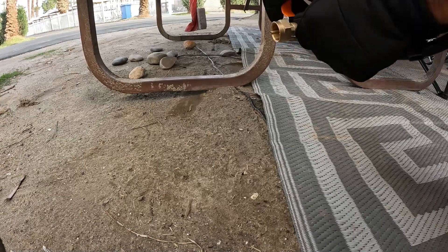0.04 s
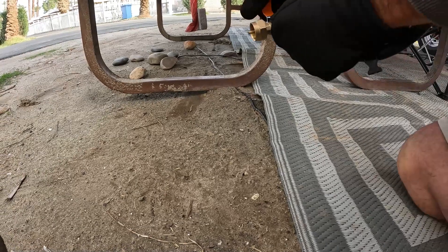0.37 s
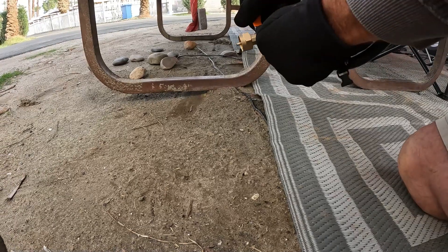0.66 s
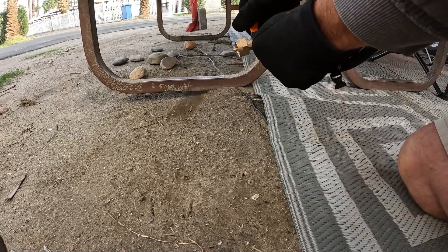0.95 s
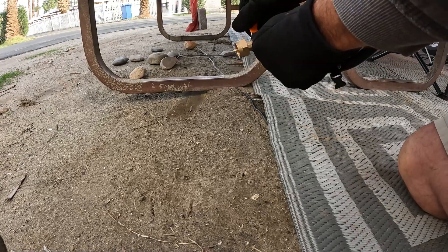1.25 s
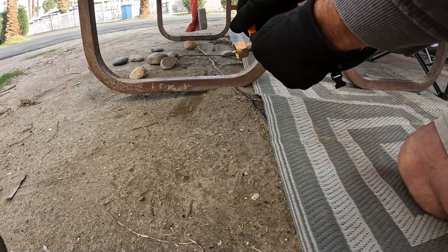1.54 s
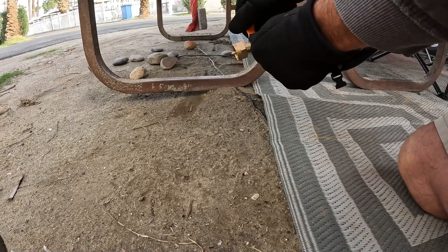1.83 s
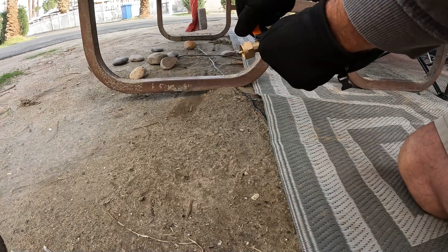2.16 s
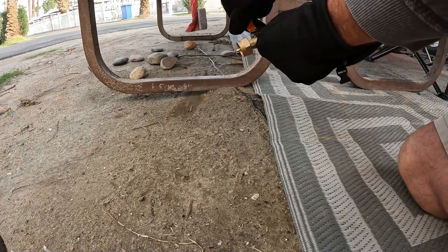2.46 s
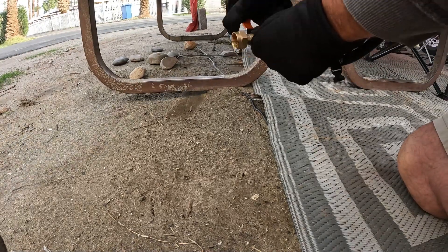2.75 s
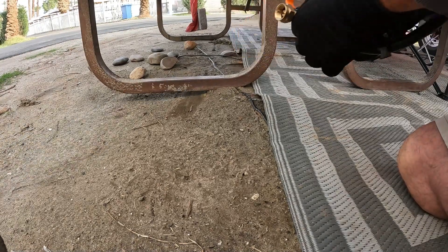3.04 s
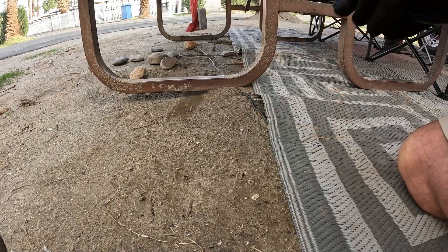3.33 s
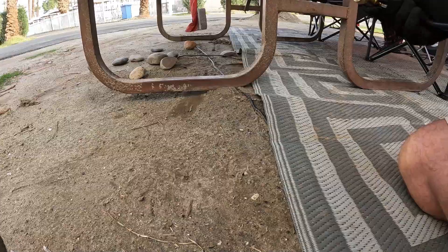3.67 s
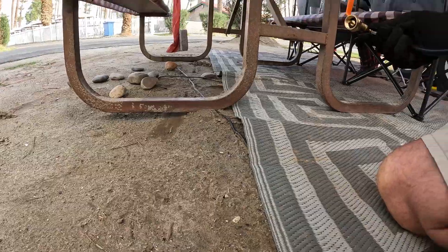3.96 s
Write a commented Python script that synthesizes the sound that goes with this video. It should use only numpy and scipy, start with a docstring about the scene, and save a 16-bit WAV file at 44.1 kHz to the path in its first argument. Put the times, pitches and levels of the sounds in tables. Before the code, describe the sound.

A close jet of gas starts thin, widens to a roaring spray and is suddenly shut off. Small valve ticks and soft glove rustling come before and after, while distant engines rumble in the open air.

```python
"""Outdoors, distant engines and traffic rumble and hum. A glove and sleeve rustle, and a brass valve
ticks as the hand eases it open. Escaping gas starts as a thin hiss, widens to a spray, roars for a
moment as a plume of mist shoots out, and is shut off. A close echo from the ground colours the jet.
A faint fizz lingers, followed by a few small squeaks, rustles and ticks."""
import sys
import numpy as np
from scipy import signal
from scipy.fft import rfft, irfft
from scipy.io import wavfile
from scipy.ndimage import uniform_filter1d, map_coordinates

SR = 44100
rng = np.random.default_rng(int(sys.argv[2]) if len(sys.argv) > 2 else 0)


def unload_wav(signal):
    """Save mono or channel-first audio to the path in sys.argv[1] as 16-bit WAV at rate SR, clipped to [-1, 1]."""
    wavfile.write(
        sys.argv[1],
        SR,
        np.round(np.clip(np.atleast_2d(signal).T, -1, 1) * 32767).astype(np.int16),
    )


N = 176400
T = np.arange(N) / SR  # time of each sample [s]
FREQS = np.fft.rfftfreq(N, 1 / SR)  # frequency of each slot in a spectrum [Hz]


def amp(db):
    """Turns decibels into a number to multiply by."""
    return 10 ** (np.asarray(db) / 20)


def unit(x):
    """Scales a signal to an average power of 1."""
    return x / np.sqrt(np.mean(x ** 2) + 1e-20)


def read(points):
    """Joins a table's points to give a value at every frequency, on a log scale."""
    hz, value = np.transpose(points)
    return np.interp(np.log(FREQS + 1), np.log(np.abs(hz) + 1), value)


def level(points):
    """Joins (time [s], level [dB]) points to give a gain at every sample."""
    return amp(np.interp(T, *np.transpose(points)))


def shape(colour, low_hz):
    """Gain at every frequency for a tone colour, turned down below low_hz."""
    low_cut = .001 + 1 / np.sqrt(1 + (low_hz / (FREQS + 1)) ** 8)
    return amp(read(colour)) * low_cut


def wander(rate_hz):
    """A smooth random wobble, mostly slower than rate_hz."""
    spectrum = rfft(rng.standard_normal(N))
    return unit(irfft(spectrum / np.sqrt(1 + (FREQS / rate_hz) ** 4), N))


def noise(colour, width, low_hz=0):
    """Stereo noise: both ears share a middle part, and an opposite side part adds width."""
    mid, side = rfft(rng.standard_normal((2, N)))
    share = amp(read(width))
    pair = np.array([mid + share * side, mid - share * side]) / np.hypot(1, share)
    return unit(irfft(pair * shape(colour, low_hz), N))


def eddies(x, depth_db, size=512):
    """Makes a sound swirl: random patches of time and frequency swell and sink."""
    slices = signal.stft(x, nperseg=size)[2]
    patches = rng.standard_normal(slices.shape[1:])
    patches = uniform_filter1d(patches, size=9, axis=0)  # smooth over frequency
    patches = uniform_filter1d(patches, size=6, axis=1)  # smooth over time
    return signal.istft(slices * amp(depth_db * unit(patches)), nperseg=size)[1][:, :N]


def arch(start, length):
    """One soft swell, shaped like half a sine wave."""
    return np.sin(np.pi * np.clip((T - start) / length, 0, 1))


def echoes(x, fade_s, channels):
    """A crowd of random reflections that fades by 60 dB in fade_s seconds."""
    t = T[:SR // 2]
    tail = rng.standard_normal((channels, len(t))) * amp(-60 * t / fade_s) * (t > .001)
    return signal.fftconvolve(x, tail / np.linalg.norm(tail[0]), axes=1)[:, :N]


# Tone colours of the engines and far traffic: (frequency [Hz], relative level [dB])
RUMBLE_COLOUR = [(10, -17.5), (25, -6), (38, -6), (48, 1), (62, -0.5), (76, -8), (135, -10.5), (165, -14.5),
                 (235, -20), (300, -32), (500, -47.5), (15000, -140)]
TRAFFIC_COLOUR = [(150, 0), (400, -0.5), (600, -1.5), (930, 0.5), (1350, -7), (1900, -15.5), (3000, -25),
                  (6000, -40.5), (9000, -55.5), (15000, -75.5)]
# How loud each one is: (time [s], level [dB])
RUMBLE_LEVEL = [(0, -24.5), (1.2, -24.5), (2.6, -26), (3.8, -23.5)]
TRAFFIC_LEVEL = [(0, -39.5), (.5, -39), (1.5, -38.5), (2.4, -42), (2.8, -40.5), (3.2, -38), (3.75, -37),
                 (4, -37)]
# Notes in the engine hum: (pitch [Hz], typical level [dB])
HUM_NOTES = [(248, -52), (334, -53.5), (468, -56)]
# How wide the street and the cloth sound: (frequency [Hz], side compared with middle [dB])
AIR_WIDTH = [(25, -37), (60, -41), (120, -49), (240, -26.5), (480, -17.5), (950, -14), (1890, -8.5),
             (7500, -6.5), (15000, -2.5)]


def street(hum_swing_db=2.5):
    """Distant engines rumble and hum unsteadily while far tyres slowly swell and fade."""
    hum = 0
    for hz, db in HUM_NOTES:
        loudness = amp(db + hum_swing_db * wander(2.9))
        pitch = hz * (1 + .008 * wander(6))
        hum += loudness * unit(np.sin(2 * np.pi * np.cumsum(pitch) / SR))
    tyres = level(TRAFFIC_LEVEL) * eddies(noise(TRAFFIC_COLOUR, AIR_WIDTH), depth_db=1.56, size=2048)
    rumble = level(RUMBLE_LEVEL) * noise(RUMBLE_COLOUR, AIR_WIDTH)
    return rumble + tyres + hum


# Tone colours of rubbing cloth and of quick strokes: (frequency [Hz], relative level [dB])
CLOTH_COLOUR = [(800, -1), (2200, 4.5), (3500, -1.5), (5500, -5.5), (7600, -9), (8400, -15.5),
                (12500, -17.5), (15000, -33)]
STROKE_COLOUR = [(1200, -6), (2400, 2), (3300, 4.5), (5200, -4.5), (7500, -10.5), (8500, -16), (13000, -21),
                 (15000, -26)]
# How loudly the glove and sleeve rub: (time [s], level [dB])
RUBBING_LEVEL = [(0, -75), (.2, -55.5), (.36, -59), (.48, -66), (.6, -60), (.75, -70), (2.3, -79.5),
                 (2.79, -90), (2.89, -61), (3.03, -65.5), (3.2, -60.5), (3.5, -59.5), (3.75, -59), (4, -58)]
# Quick strokes of the glove: (start [s], length [s], level [dB])
STROKES = [(.385, 0.033, -48.5), (.408, .045, -53.5), (2.825, 0.057, -53), (3.143, .035, -54)]


def glove():
    """Cloth rubs with a grainy rustle, and the glove brushes the valve a few times."""
    rubbing = level(RUBBING_LEVEL) * noise(CLOTH_COLOUR, AIR_WIDTH)
    swells = sum(amp(db) * arch(start, length) for start, length, db in STROKES)
    strokes = swells * noise(STROKE_COLOUR, AIR_WIDTH)
    grain = amp(1.8 * wander(200))
    return grain * eddies(rubbing + strokes, depth_db=1.0)


def snap(start, colour, low_hz):
    """One sharp click with the given tone colour and a total energy of 1."""
    gain = shape(colour, low_hz)
    log_gain = np.log(np.concatenate([gain, gain[-2:0:-1]]))
    phase = -signal.hilbert(log_gain).imag[:len(FREQS)]  # packs the energy at the click's front
    delay = 2 * np.pi * FREQS * start
    click = irfft(gain * np.exp(1j * (phase - delay)), N)
    return click / np.linalg.norm(click)


# Ticks of the brass valve: (time [s], rattle level [dB], time to fade 60 dB [s], low cut [Hz])
TICKS = [(0.2302, -27, 0.0096, 500), (0.4976, -49, 0.014, 3100), (0.5454, -50.5, 0.013, 3600),
         (2.8815, -47, 0.015, 3200), (3.738, -52, 0.013, 2500)]
# Tone colour of a tick: (frequency [Hz], relative level [dB])
TICK_COLOUR = [(400, -6), (1150, 7), (1900, 1), (2700, 2), (4000, -2), (5600, -1), (7500, -13), (9300, -7),
               (11500, -18), (15000, -24)]
# How wide the ticks and the gas sound: (frequency [Hz], side compared with middle [dB])
VALVE_WIDTH = [(120, -41), (400, -17.5), (2000, -21), (6000, -12), (10000, -15.5), (11500, -13),
               (12300, -6.5), (13500, -2.5)]


def valve_ticks(snap_db=13, rise_s=.0006, tail_db=-34, tail_fade_s=.086):
    """The hand stops the brass ringing, so each tick is a snap, a short rattle and a faint tail."""
    ticks = np.zeros((2, N))
    for start, db, fade_s, low_hz in TICKS:
        age = np.maximum(T - start, 0)
        rise = np.minimum(age / rise_s, 1)
        fade = amp(-60 * age / fade_s) + amp(tail_db - 60 * age / tail_fade_s)
        rattle = rise * fade * noise(TICK_COLOUR, VALVE_WIDTH, low_hz)
        ticks += amp(db) * (amp(snap_db) * snap(start, TICK_COLOUR, low_hz) + rattle)
    return ticks


# Tone colours of the thin leak, broad spray and roaring plume: (frequency [Hz], relative level [dB])
LEAK_COLOUR = [(500, -23), (1400, -3.5), (2300, 1.5), (2700, -3.5), (3250, 5), (3900, 3.5), (4100, -2.5),
               (5050, 5.5), (5550, -21), (6100, 1), (6750, -10.5), (7100, -1.5), (8500, 2), (9000, 1),
               (9700, -1.5), (10050, -12.5), (12600, -18), (14000, -29)]
SPRAY_COLOUR = [(400, -5), (1200, -4), (2400, 0), (2800, 0), (3100, 2), (4000, 2), (5000, 3), (7400, 2),
                (8500, 0), (9800, 2), (10500, -2), (12600, -1.5), (13500, -10.5), (15200, -19)]
ROAR_COLOUR = [(100, 6.5), (300, -3), (520, 2), (860, -3), (1100, 3), (1750, 1), (2100, -3.5), (2350, -1.5),
               (2850, -2), (3050, 4.5), (3650, 2), (4400, -3.5), (8000, -11), (15000, -17.5)]
# How loud the spray and roar are while the valve is open: (time [s], level [dB])
SPRAY_LEVEL = [(.87, -42), (.97, -38), (1.08, -40), (1.15, -47), (1.365, -47), (1.405, -33), (1.62, -33.5),
               (1.82, -31.5), (1.92, -27.5), (2.02, -27), (2.07, -22.5), (2.17, -22.5), (2.245, -23.5),
               (2.28, -30.5)]
ROAR_LEVEL = [(1.7, -54), (1.9, -40.5), (2.02, -39), (2.07, -25), (2.15, -22), (2.225, -22), (2.255, -23.5),
              (2.28, -38)]
OPEN_S, SHUT_S = .8736, 2.277  # when the valve is open, and when it starts to shut
OPEN_RISE_S, SHUT_FALL_S = .044, .031  # time to rise or fall by 40 dB
SPIT_FADE_S, FIZZ_FADE_S = .11, .55  # time to fade by 60 dB


def gas_jet(leak_db=-39, spit_db=-42, fizz_db=-62.5, sputter_db=.5, sputter_hz=90):
    """Leak, spray and roar rush through one valve, so they sputter and stop together."""
    closed = np.maximum(OPEN_S - T, 0) / OPEN_RISE_S + np.maximum(T - SHUT_S, 0) / SHUT_FALL_S
    valve = amp(-40 * closed)
    hiss = noise(SPRAY_COLOUR, VALVE_WIDTH)
    spray = level(SPRAY_LEVEL) * hiss
    leak = amp(leak_db) * noise(LEAK_COLOUR, VALVE_WIDTH)
    roar = level(ROAR_LEVEL) * noise(ROAR_COLOUR, VALVE_WIDTH)
    # A bright spit as the seal cracks open.
    spit_level = amp(spit_db - 60 * abs(T - OPEN_S) / SPIT_FADE_S)
    spit = spit_level * noise(SPRAY_COLOUR, VALVE_WIDTH, low_hz=8000)
    # Gas left in the nozzle fizzes out after the valve shuts.
    fizz = (T > SHUT_S) * amp(fizz_db - 60 * abs(T - SHUT_S) / FIZZ_FADE_S) * hiss
    gas = eddies(leak + spray + roar + spit, depth_db=.9)
    sputter = amp(sputter_db * wander(sputter_hz))
    return gas * valve * sputter + fizz


# The ground echo comes sooner as the hand settles: (time [s], delay [s])
GROUND_DELAY = [(1.1, .000537), (1.6, .00053), (2.15, .000514)]
# How much louder the jet is on the left: (frequency [Hz], left minus right [dB])
EAR_BALANCE = [(200, -0.5), (1500, -0.9), (2300, -1.5), (5000, -.3), (8000, -.6), (11000, 0.3), (12200, 5),
               (13500, -0.5)]
# How far its wave is ahead on the left: (frequency [Hz], phase lead [radians])
EAR_PHASE = [(700, 0), (1900, 0.33), (2300, 0.5), (3500, 0.4), (6000, 0.42), (10000, 0.14), (12300, 1),
             (13300, -1.5)]


def outdoors(jet, ground_gain=.4, scatter_db=-12.5, yard_db=-22):
    """The jet bounces off the ground and nearby things, and reaches the ears slightly out of step."""
    echo_samples = (T - np.interp(T, *np.transpose(GROUND_DELAY))) * SR
    bounce = np.array([map_coordinates(side, [echo_samples], order=3) for side in jet])
    # So close an echo boosts some frequencies and weakens others.
    coloured = (jet + ground_gain * bounce) / np.hypot(1, ground_gain)
    left = amp(read(EAR_BALANCE) / 2) * np.exp(.5j * read(EAR_PHASE))
    near = irfft(rfft(coloured) * np.array([left, 1 / left]), N)
    scatter = amp(scatter_db) * echoes(near, fade_s=.07, channels=1)  # off a chair frame and stones
    yard = amp(yard_db) * echoes(near, fade_s=.18, channels=2)
    return near + scatter + yard


# Faint squeaks: (start [s], length [s], pitch [Hz], level [dB], wobble [share of the pitch])
SQUEAKS = [(2.59, .14, 1445, -48, .008), (2.612, .045, 2400, -55.5, .015), (3.875, 0.016, 5760, -55.5, .04)]


def squeaks():
    """Short, faint tones with a shaky pitch."""
    tones = np.zeros(N)
    for start, length, hz, db, wobble in SQUEAKS:
        pitch = hz * (1 + wobble * wander(200))
        tones += amp(db) * arch(start, length) * np.sin(2 * np.pi * np.cumsum(pitch) / SR)
    return tones


def scene():
    """Adds the gas jet and its echoes to the handling sounds and the street."""
    return outdoors(gas_jet()) + valve_ticks() + glove() + street() + squeaks()


def record(dry, top_hz=15400):
    """Cuts away the very highest treble."""
    low_pass = signal.firwin(511, top_hz, window=("kaiser", 9), fs=SR)
    return signal.oaconvolve(dry, low_pass[None], "same")


dry = scene()
out = record(dry)
unload_wav(out)
```